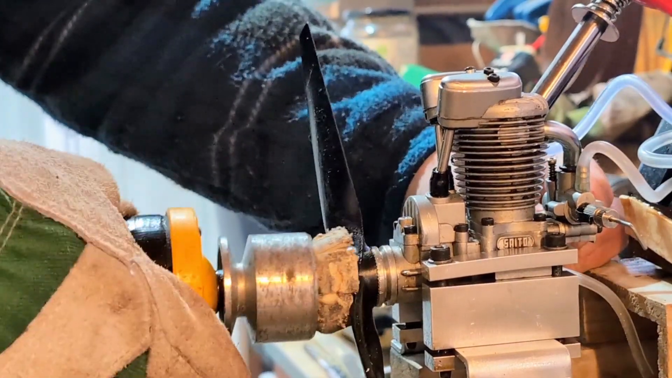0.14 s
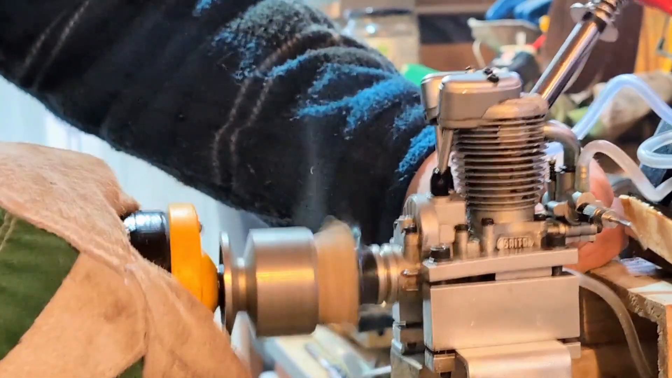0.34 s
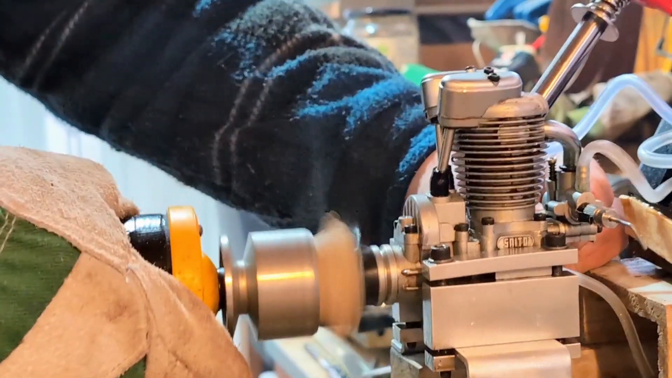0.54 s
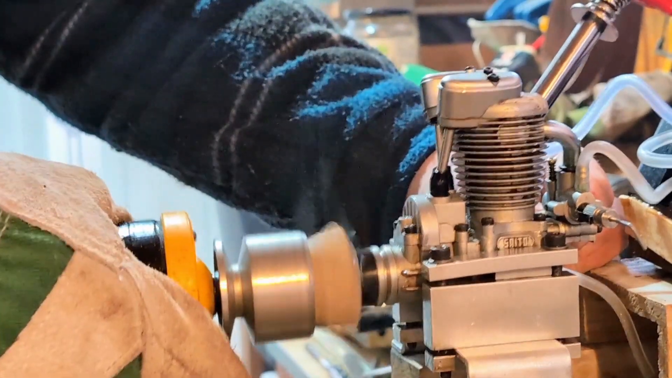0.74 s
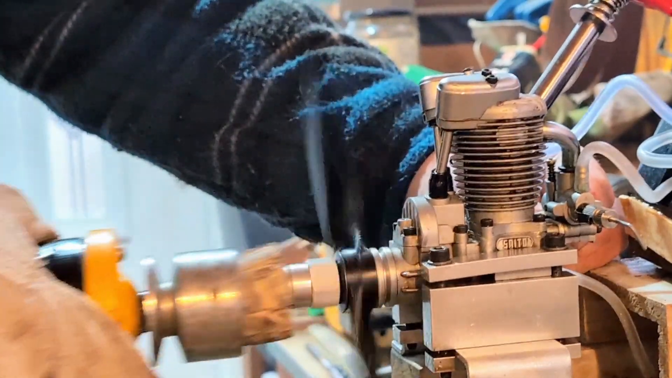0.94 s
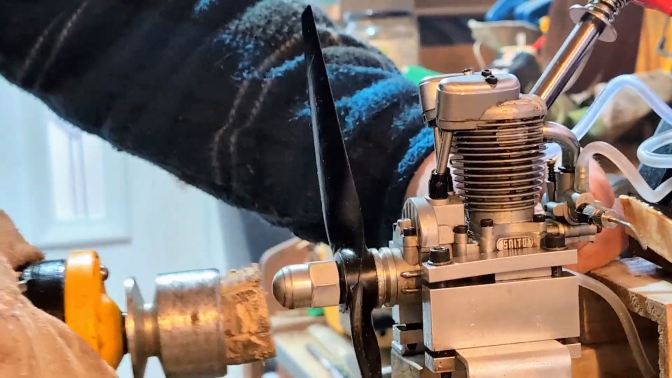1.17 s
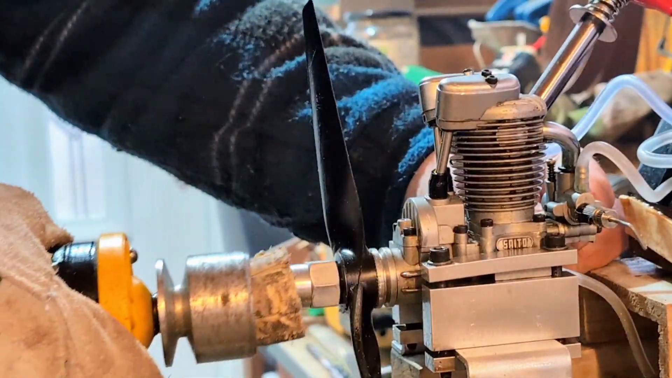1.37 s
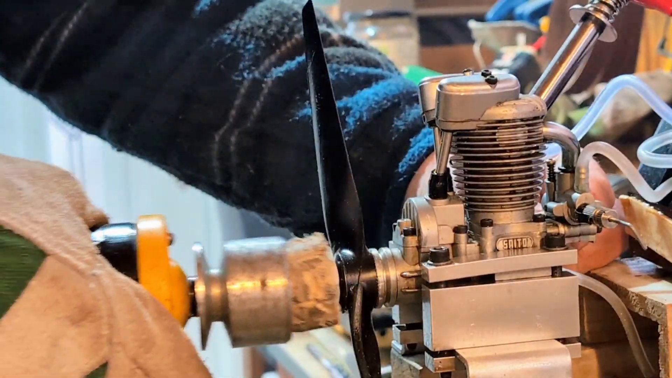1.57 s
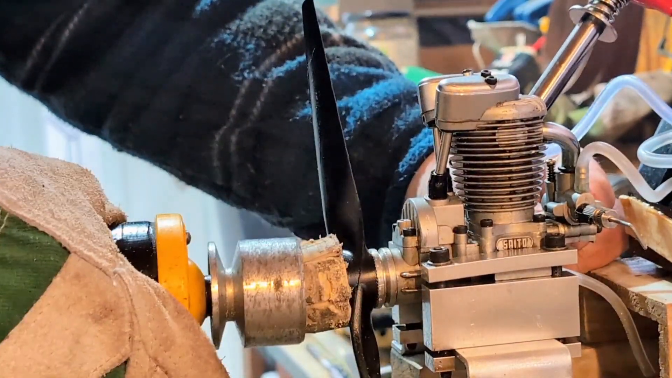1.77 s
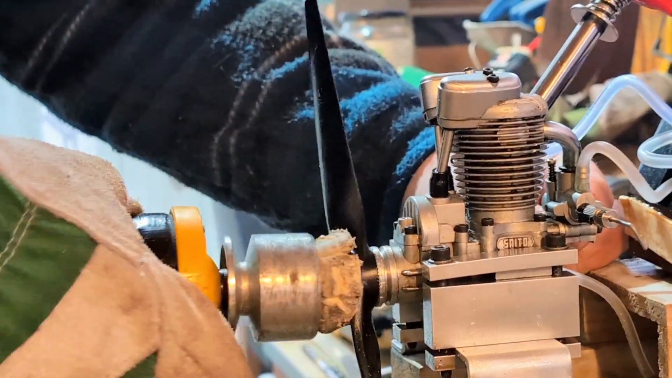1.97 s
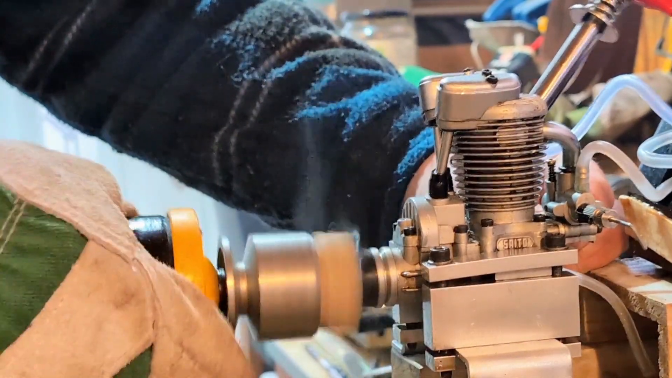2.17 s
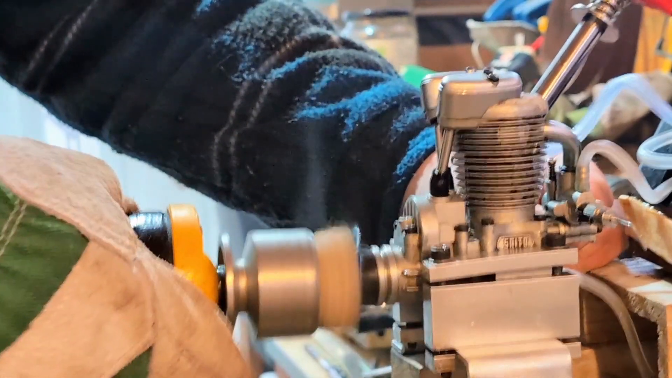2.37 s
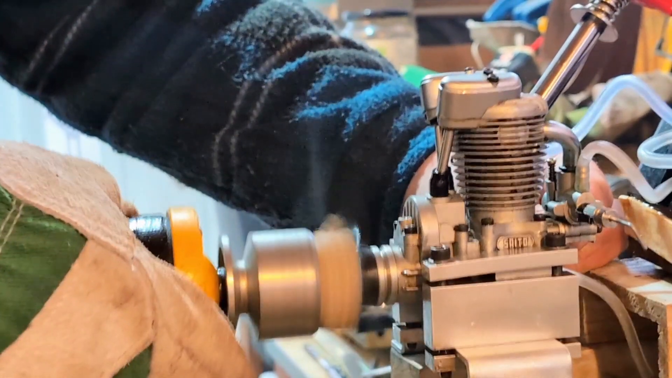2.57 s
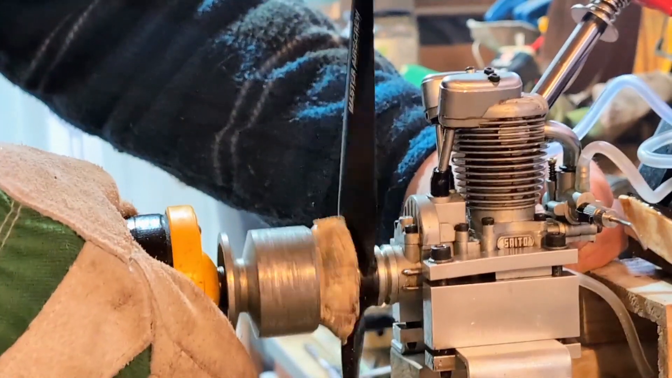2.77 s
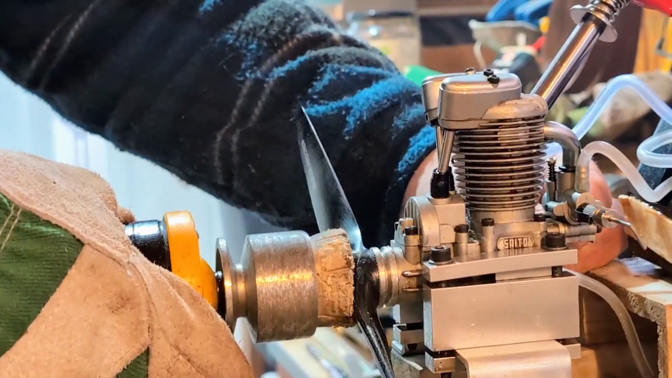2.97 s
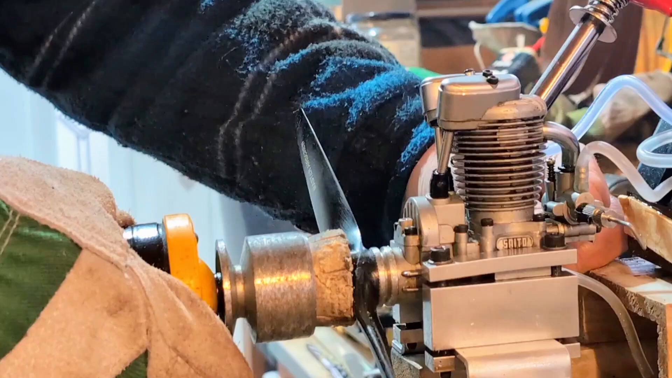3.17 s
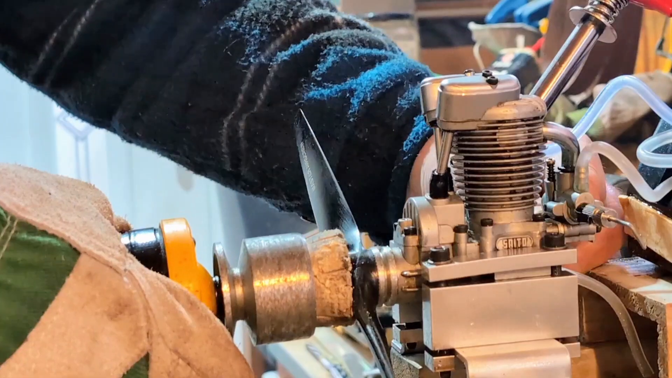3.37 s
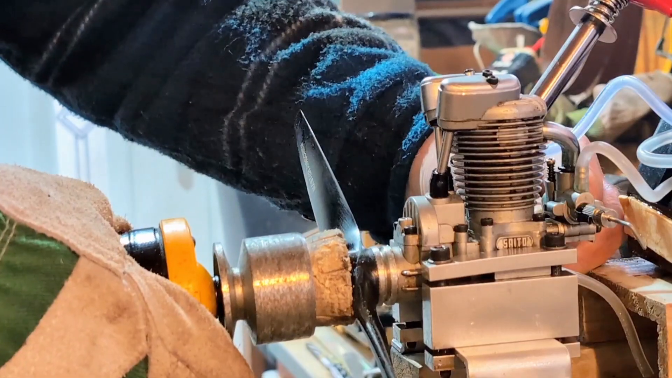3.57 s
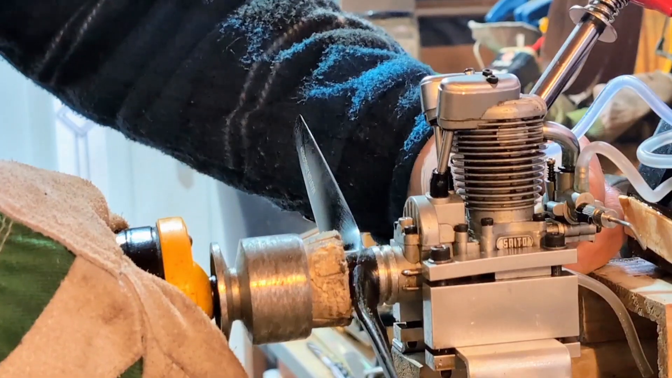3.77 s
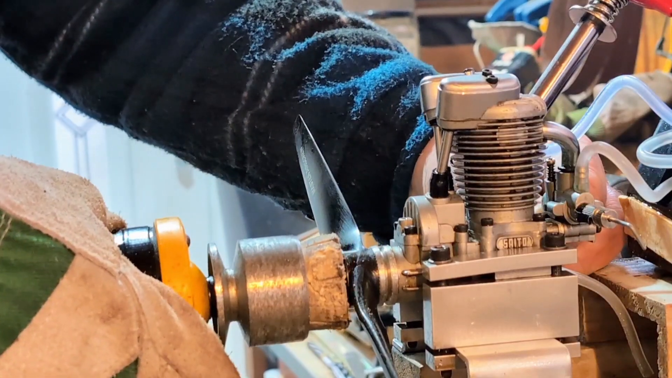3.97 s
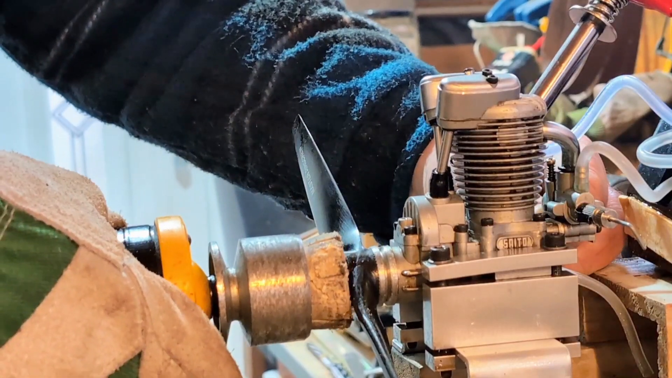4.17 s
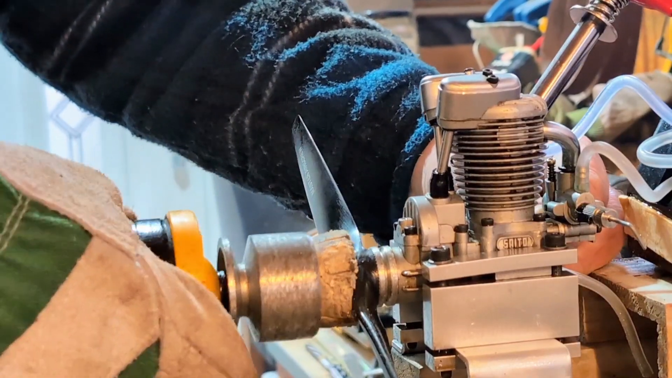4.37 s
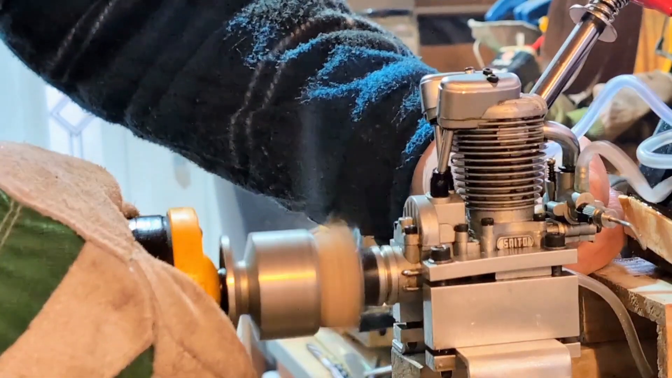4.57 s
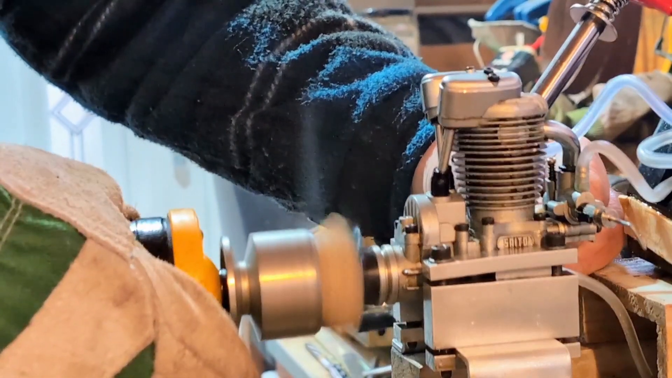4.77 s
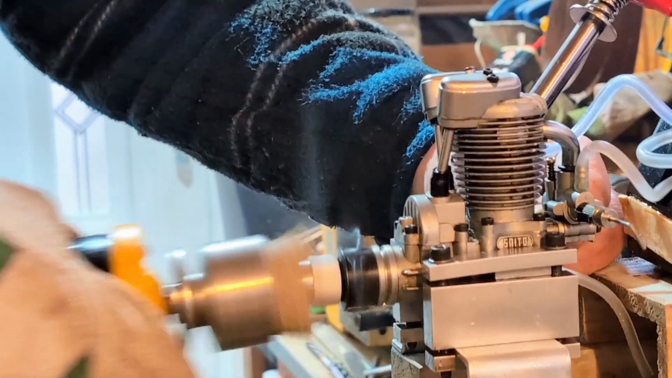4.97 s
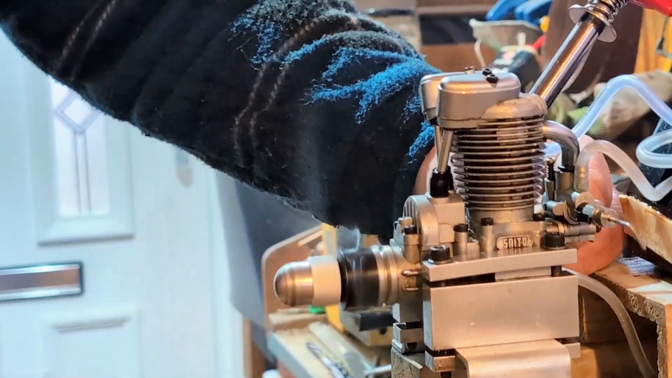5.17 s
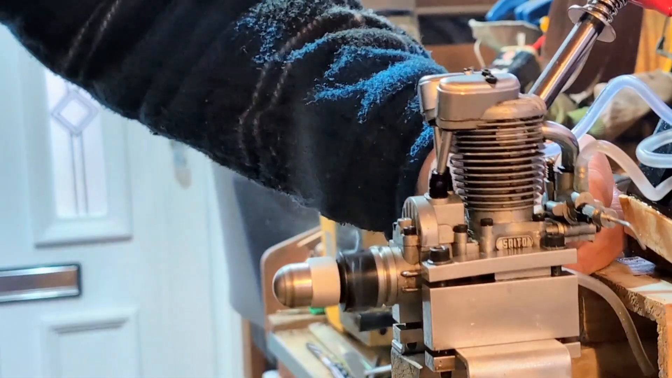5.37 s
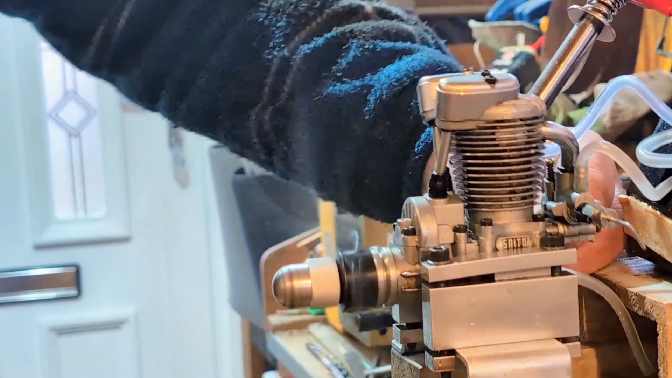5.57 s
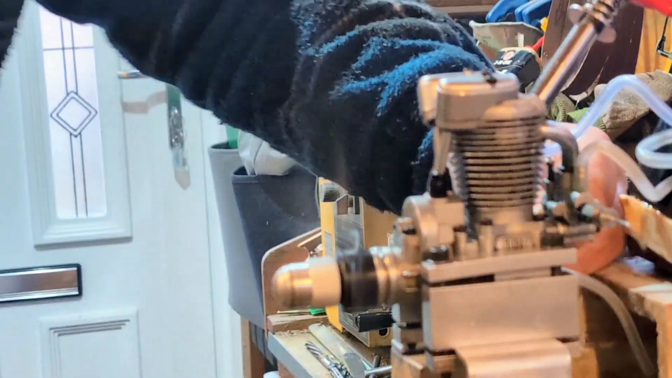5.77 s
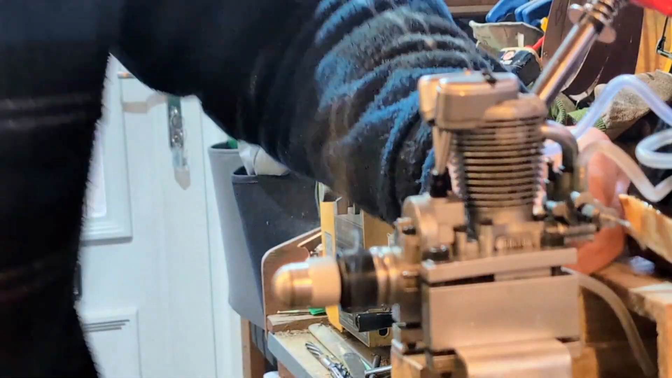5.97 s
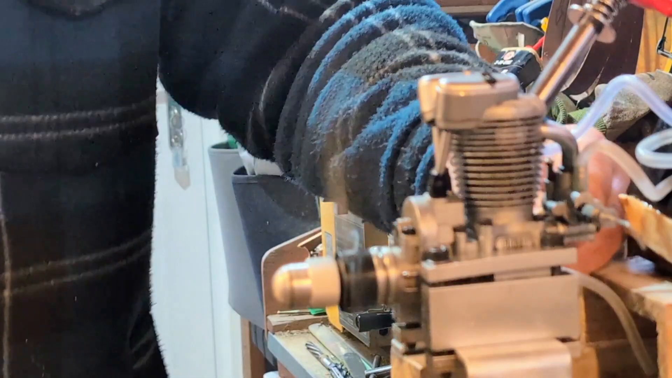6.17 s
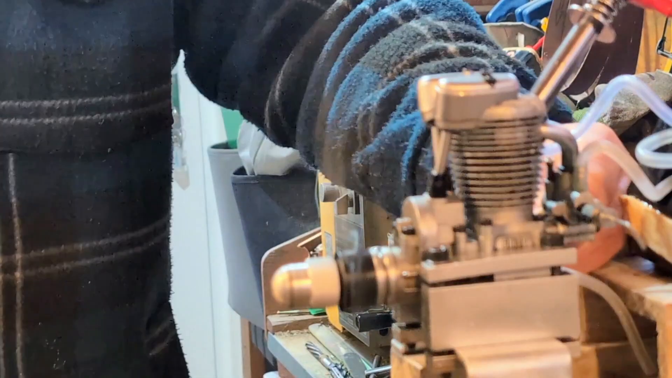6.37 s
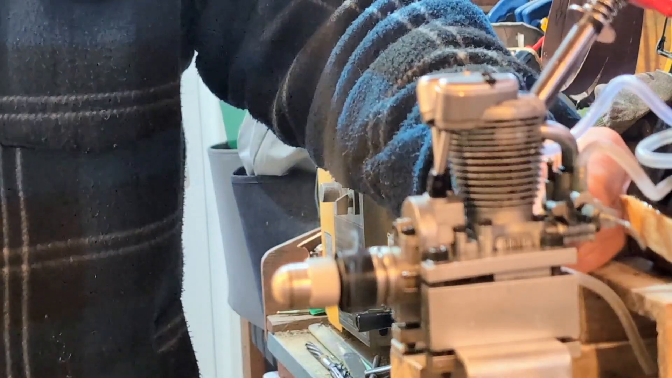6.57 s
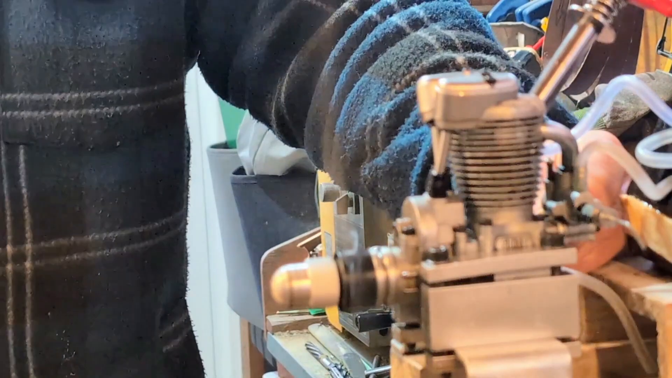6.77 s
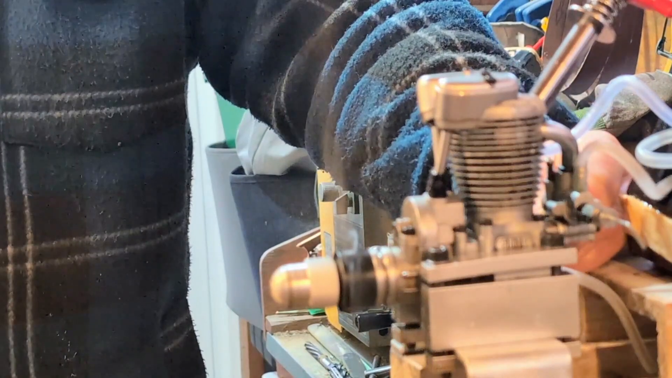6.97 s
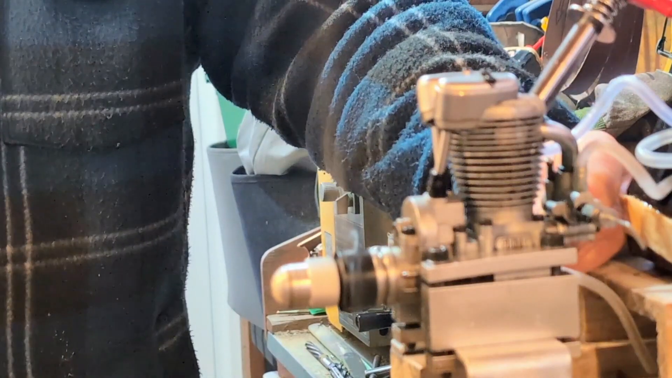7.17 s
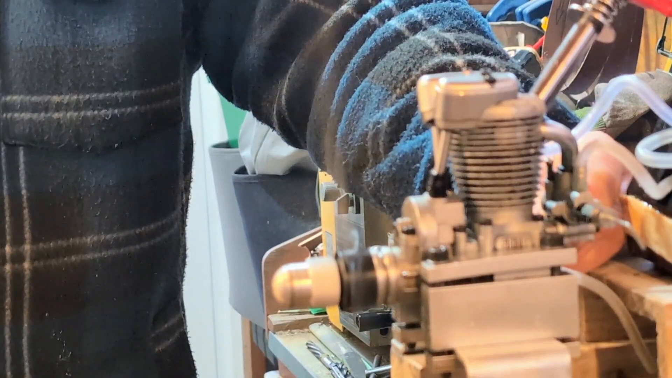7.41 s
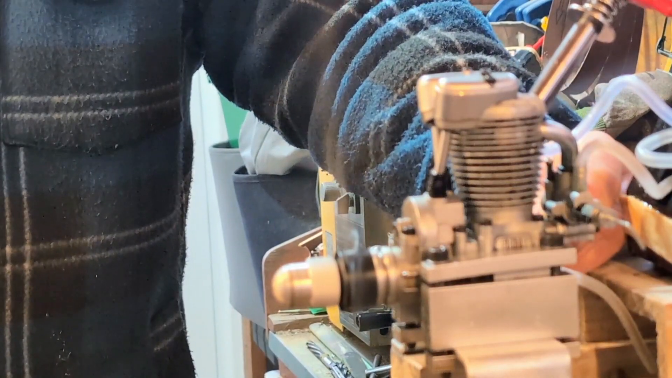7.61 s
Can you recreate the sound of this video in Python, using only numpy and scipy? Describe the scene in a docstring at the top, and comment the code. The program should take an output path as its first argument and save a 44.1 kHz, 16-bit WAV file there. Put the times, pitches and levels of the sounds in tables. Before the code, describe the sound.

An electric starter whirs and squeals against a small model aircraft engine, which catches on the third try and runs unevenly, speeding up.

```python
"""A small four-stroke glow engine is started on a workbench. An electric starter spins it twice in vain:
the motor whirs, unburnt fuel and air hiss out once a cycle (two shaft turns), the drive cup squeals.
At the third try it pops, catches and runs unevenly: each firing is a valve crack and an exhaust thump,
over the rush of gas and propeller. The bench wobbles in the bass, fittings tick, the small room echoes,
and a faint electric buzz fills the pauses."""
import sys
import numpy as np
from scipy import signal
from scipy.fft import rfft, irfft, next_fast_len
from scipy.io import wavfile
from scipy.ndimage import uniform_filter1d, map_coordinates

SR = 44100
rng = np.random.default_rng(int(sys.argv[2]) if len(sys.argv) > 2 else 0)


def inscribe(sig):
    """Save sig as 16-bit PCM at rate SR to the path in sys.argv[1].

    A 1-D sig is mono; a 2-D sig holds one channel per row.
    Samples are clipped to [-1, 1] before scaling.
    """
    pcm = np.round(np.clip(np.atleast_2d(sig).T, -1, 1) * 32767)
    wavfile.write(sys.argv[1], SR, pcm.astype(np.int16))


N = 336924

# Levels are relative. A COLOUR says how strong each pitch is; RINGS are pitches a part rings at.
# Engine speed once it has caught: time_s, firings_per_s
ENGINE_SPEED = [(5.166, 31.5), (5.2, 35), (5.31, 45.9), (5.38, 50.3), (5.53, 56.2), (5.61, 55.5), (5.7, 54),
                (5.92, 49.4), (6.06, 47.6), (6.22, 55), (6.3, 58.6), (6.55, 57.3), (6.75, 63.3),
                (6.82, 64.9), (7.01, 66.7), (7.19, 70.5), (7.43, 76.3), (7.64, 81.1)]
# Exhaust thump, valve crack, the engine's rush and its low, rough layer: pitch_hz, level_db
THUMP_COLOUR = [(100, -31), (200, -4.5), (330, -0.5), (450, 3.5), (560, -3.5), (640, -4), (800, -7),
                (1300, -23), (4000, -76.5)]
CRACK_COLOUR = [(200, -30), (650, -5), (1000, 0), (1300, -1.5), (2150, -3), (2600, -11), (4000, -18),
                (12000, -40)]
ROAR_COLOUR = [(900, -21.5), (2300, -0.5), (4000, -2), (6000, 0.5), (9200, -1), (11500, -2.5), (13000, -10),
               (15500, -10), (16400, -40)]
LOW_ROAR_COLOUR = [(60, -30), (150, -2), (2000, 0), (3500, -30)]
# Muffler, exhaust pipe and casing: pitch_hz, width_hz, level_db
MUFFLER_RINGS = [(339, 60, -5.5), (449.6, 16, 0.5), (532, 13, 1.5)]
PIPE_RINGS = [(830.7, 41, 4.5), (969, 25, 3.5), (1112, 27, 1), (1642, 61, 3.5), (2128, 20, 3.5)]
CASING_RINGS = [(373.3, 220, -8.5), (950, 180, 1.5), (1170, 120, -4.5), (1384, 31, 1.5), (1627, 150, -2),
                (1867, 71, -5.5), (2113, 67, -2), (2885, 83, 0.5)]
# Quick echoes of the crack, a left list and a right list: delay_s, level_db
CRACK_ECHOES = [
    [(.001, -11), (.0027, -8), (.0048, -5), (.0067, -6), (.0088, -2)],
    [(.0024, -1), (.0046, -6), (.0062, -2), (.0077, -1.5)],
]
# Loudness of the gas and propeller rush: time_s, level_db
ROAR_LEVELS = [(4.58, -43.5), (4.645, -35.5), (4.71, -24.5), (4.995, -27.5), (5.37, -21.5), (6.495, -22.5),
               (6.655, -22), (7.64, -22)]
# The starter turning the engine, one list a try: time_s, cycles_so_far, burst_db
TRIES = [
    [(.4095, 0, -6), (.5167, 1, -9.5), (.5711, 2, -7.5), (.6619, 4, -8.5), (.7552, 6, -12.5),
     (.8126, 7, -12), (.8959, 8, -18), (.9792, 9, -30.5)],
    [(2.2752, 0, -16), (2.3444, 1, -15), (2.4139, 2, -9.5), (2.4693, 3, -11), (2.5194, 4, -8),
     (2.7496, 9, -10.5), (2.808, 10, -14.5), (2.8858, 11, -13.5)],
    [(4.639, 0, -11), (4.69, 1, -9.5), (4.733, 2, -6.5), (4.768, 3, -8.5), (4.806, 4, -9), (5.011, 9, -8.5),
     (5.056, 10, -9), (5.133, 12, -8), (5.166, 13, -9.5)],
]
# Loudness of the starter's whir, one list a try: time_s, level_db
WHIR_LEVELS = [
    [(.32, -65.5), (.355, -43.5), (.405, -30), (.465, -34.5), (.535, -22), (.615, -20), (.845, -27.5),
     (.96, -35.5), (1.17, -52.5), (1.325, -72.5)],
    [(2.22, -63.5), (2.255, -35), (2.31, -28.5), (2.495, -25.5), (2.51, -22.5), (2.68, -21), (2.845, -28.5),
     (2.922, -33.5), (2.96, -43), (3.07, -54), (3.17, -65)],
    [(4.559, -58), (4.644, -22.5), (4.89, -22), (5.04, -25), (5.3, -21.5), (5.451, -52.5)],
]
# The starter's whir and the jet of unburnt gas: pitch_hz, level_db
WHIR_COLOUR = [(65, -27.5), (110, 2), (214, -3.5), (339, -3.5), (688, -8), (1130, -4.5), (1460, -4),
               (2900, -3.5), (4880, -5), (10800, -12.5), (14700, -27), (16000, -37)]
JET_COLOUR = [(1760, -35.5), (3000, -7.5), (5440, 0), (7720, 1), (9140, -6), (10700, -8), (16000, -19.5)]
# Squeals of the drive cup: start_s, length_s, low_tone_db, high_tone_db
SQUEALS = [(.61, .04, -29, -31), (0.675, .04, -26, -27), (2.504, .09, -21, -23.5), (2.621, .055, -27, -25),
           (2.69, .1, -38.5, -30), (4.679, 0.08, -24, -28)]
# The cup slipping on the propeller's nose cone: start_s, pitch_hz, level_db
SLIPS = [(0.586, 1091, -23.5), (2.339, 985, -30.5), (2.378, 1110, -29), (2.451, 1814, -24.5),
         (2.509, 2870, -25.5), (2.538, 2893, -26), (2.675, 2890, -28.5), (2.765, 1798, -25),
         (2.833, 1146, -24.5)]
# Small contacts between parts: start_s, level_db, kind
CONTACTS = [(0.096, -53, "clip"), (0.1855, -45.5, "knock"), (0.2322, -49.5, "knock"),
            (0.323, -44.5, "clank"), (1.0275, -29, "clank"), (1.049, -37, "clank"), (1.106, -36, "clank"),
            (1.1627, -42, "seat"), (1.2273, -45.5, "seat"), (1.26, -53, "knock"), (1.8047, -49, "seat"),
            (2.0704, -52, "knock"), (2.1192, -38, "seat"), (2.133, -34, "clank"), (2.219, -40.5, "clank"),
            (2.255, -26, "clank"), (2.506, -18, "clank"), (3.0004, -22, "ping"), (3.1566, -54, "clip"),
            (3.9132, -54, "clip"), (3.974, -61.5, "knock"), (4.435, -71, "knock"), (4.5253, -51.5, "clip"),
            (4.5833, -20.5, "ping")]
# How hard each kind of contact shakes each part: steel_db, wood_db, clip_db, cup_db
CONTACT_KINDS = {"clip": (9.5, -18, -1.5, -9.5), "knock": (-43, -2, -35, -30),
                 "seat": (-20, 0, -6.5, -17.5), "clank": (1.5, -14.5, -13, -13),
                 "ping": (1.5, -21.5, -22.5, -33)}
# Steel fittings, wooden bench, spring clip and drive cup: pitch_hz, width_hz, level_db
STEEL_RINGS = [(6400, 500, 2.5), (7330, 92, 10.5), (9500, 99, 8.5), (10400, 98, 10.5)]
WOOD_RINGS = [(338.4, 550, 3), (700, 330, -1), (1214, 740, 0)]
CLIP_RINGS = [(1660, 160, 4.5), (2050, 130, 5)]
CUP_RINGS = [(3300, 2400, 0), (4400, 1100, -3)]
# Swells of the bench's low wobble, in the pauses and during cranking: time_s, peak_db
BENCH_SWELLS = [(.13, -57.5), (.28, -49.5), (0.439, -32), (1.15, -45), (1.308, -43), (1.51, -41.5),
                (1.661, -45.5), (1.85, -52), (1.93, -49.5), (2.12, -43.5), (3.201, -41.5), (3.38, -37.5),
                (3.54, -36.5), (3.81, -42.5), (3.99, -44.5), (4.15, -45), (4.36, -48), (4.49, -47),
                (4.798, -28.5)]
# Standing waves in the room that lift the bass: pitch_hz, width_hz, level_db
ROOM_BOOMS = [(86, 3.4, 1.5), (211, 21, -4), (254, 32, -27.5), (336.4, 26, -7.5)]
# Standing waves that cancel it: pitch_hz, width_hz, removed_part_db
ROOM_DIPS = [(104.4, 19, -2.5), (150.5, 8.5, 6), (236.2, 8.3, -0.5)]
# Time the room's echo takes to fade by 60 dB: pitch_hz, fade_s
ROOM_FADES = [(200, 0.33), (2000, 0.25), (10000, 0.057)]
# Overtones of the electric buzz: pitch_multiple, level_db
BUZZ_TONES = [(4, -84), (6, -79), (8, -79), (14, -86), (15, -87), (17, -77)]
# The room's quiet hush: pitch_hz, level_db
HUSH_COLOUR = [(53, -26.5), (90, -6), (122, -14), (188, -30), (1240, -35), (2690, -41.5), (4490, -41.5),
               (12000, -61.5), (15600, -94.5), (22000, -120)]
# How alike a noise is on the left and right (1 = the same): pitch_hz, likeness
STEREO_LIKENESS = [(60, 0.93), (240, 0.99), (950, 0.036), (3770, 0.029), (15000, 0.02)]
# Colour difference between the two microphones: pitch_hz, left_minus_right_db
MIC_BALANCE = [(60, -2), (150, -4.5), (380, 0), (950, 0), (2380, 1.8), (5980, -8), (15000, -6)]

THUMP_DB, CRACK_DB, CRACK_GROWS_S = -24.5, -23, 0.3
STEADY_PER_S, STUMBLE_S = 55, .000025  # each firing a second below steady adds this much timing scatter
FALTER_AT_S, FALTER_WIDTH_S, FALTER_DB = 7.315, .012, -5  # one brief dip in the engine's level
SQUEAL_HZ, SQUEAL_WAVER_HZ = (4812, 9370), (3, 20)
BENCH_HZ, BUZZ_HZ = 56.9, 256.6


def engine():
    """The engine pops, catches and speeds up. Returns its noisy sounds and its hum separately."""
    t = np.arange(N) / SR
    rate = curves(ENGINE_SPEED)[0]
    pop_s, pop_db = strokes(TRIES[-1])
    caught_s = pop_s[-1]
    cycle = np.interp(t, pop_s, np.arange(len(pop_s)), left=-.5) + np.cumsum(rate * (t >= caught_s)) / SR
    fired = np.flatnonzero(np.diff(np.floor(cycle)) > 0) + 1  # the sample where each cycle begins
    timing_luck, thump_luck, crack_luck = rng.standard_normal((len(fired), 3)).T
    share_db = 10 * np.log10(SR / rate[fired])  # a steady level shared out among the firings
    starting = t[fired] < caught_s + .01
    starting_db = np.interp(t[fired], pop_s, pop_db)
    scatter = .7 + SR * STUMBLE_S * np.clip(STEADY_PER_S - rate[fired], 0, 8)
    fired = np.clip(fired + np.round(scatter * timing_luck).astype(int), 0, N - 1)

    # Thump and crack both thin out by 5 dB each time the speed doubles.
    thump_db = THUMP_DB + share_db - 5 * np.log2(np.maximum(rate[fired], 50) / 60) + 0.91 * thump_luck
    growing_db = CRACK_DB - 6 * np.clip(1 - (t - caught_s) / CRACK_GROWS_S, 0, 1)
    crack_db = growing_db[fired] + share_db - 4 - 5 * np.log2(np.maximum(rate[fired], 60) / 60)
    thumps = exhaust_thumps(fired, np.where(starting, starting_db + 17, thump_db))
    cracks = valve_cracks(fired, np.where(starting, starting_db + 7, crack_db + crack_luck))
    hum = engine_hum(cycle, rate, fade_in=np.clip((t - caught_s) / 0.06, 0, 1))
    beat = 0.64 + 0.65 * np.exp(-(cycle % 1) / rate / 0.031)  # loudest as the valve opens
    roar = gas_roar() + low_roar(rate, growing_db) * np.clip((t - pop_s[0]) / .02, 0, 1)
    falter = amp(FALTER_DB * bump(FALTER_AT_S, FALTER_WIDTH_S))
    return falter * (cracks - thumps + beat * roar), falter * hum


def exhaust_thumps(fired, db):
    """Each push of exhaust rings the muffler and reaches the right side just before the left."""
    pushes = pulses(fired, db, THUMP_COLOUR)
    thumps = filtered(pushes, lambda hz: resonant(MUFFLER_RINGS, hz) * standing_waves(hz))
    return np.array([delayed(thumps, 0.0005), delayed(thumps, 0.0002)])


def valve_cracks(fired, db):
    """Each crack of the valve rings the pipe, followed by quick echoes of wavering strength."""
    cracks = filtered(pulses(fired, db, CRACK_COLOUR), lambda hz: resonant(PIPE_RINGS, hz))
    return np.array([cracks + sum(amp(echo_db + wobble(12)) * delayed(cracks, s) for s, echo_db in side)
                     for side in CRACK_ECHOES])


def engine_hum(cycle, rate, fade_in):
    """Bench, shaft and propeller blades hum at multiples of the firing rate."""
    bench_db = -24 + 20 * np.log10(np.abs(resonant([(BENCH_HZ, 7, 0)], rate, 0.029)))  # booms near BENCH_HZ
    blade_db = -29 + 19 * np.log2(rate / 60)  # louder with speed
    levels = {1: bench_db, 2: -29, 3: -44.5, 4: blade_db, 8: -39}  # 2 is the shaft, 4 and 8 the blades
    tones = sum(amp(db + 2.4 * wobble(13)) * np.sin(2 * np.pi * k * cycle) for k, db in levels.items())
    return filtered(np.sqrt(2) * fade_in * tones, standing_waves)


def gas_roar():
    """Exhaust gas and the propeller's wind make a fluttering rush."""
    db = curves(ROAR_LEVELS, rest=-120)[0] - 1.2
    flutter_db = 0.79 * wobble(5.4) + 0.74 * wobble(20) + 1.6 * wobble(300)
    return amp(db + flutter_db) * stereo_noise(ROAR_COLOUR, CASING_RINGS[-1:])


def low_roar(rate, db):
    """The low, rough layer of the engine's rush, weaker at high speed."""
    speed_db = -9 * np.log2(np.maximum(rate, 58) / 58)
    return amp(db - 9 + speed_db + 2 * wobble(90)) * stereo_noise(LOW_ROAR_COLOUR)


def starter():
    """The electric motor whirs and turns the humming propeller through a cup that squeals and slips."""
    whir_db = curves(*WHIR_LEVELS, rest=-120)[0]
    whir = motor_whir(whir_db)
    squeal = cup_squeal()
    cycle = cranked_cycles()
    turning = np.clip(np.gradient(cycle) * SR / 20, 0, 1) ** 2
    blades = sum(amp(whir_db + db + 3.4 * wobble(14)) * np.sin(2 * np.pi * multiple * cycle)
                 for multiple, db in ((4, -7), (6, -15)))
    return whir + squeal + cup_slips() + turning * blades


def motor_whir(db):
    """Brush and gear noise rings in the casing; the gears mesh unevenly, so each band flickers."""
    low, middle, high = [unit(amp(1.5 * wobble(60) + 2.5 * wobble(300))) for band in range(3)]
    noise = stereo_noise(WHIR_COLOUR, CASING_RINGS)
    treble = filtered(noise, lambda hz: 1 / (1 + (3500 / (hz + 1)) ** 4))
    bass = filtered(noise, lambda hz: 1 / (1 + (hz / 1400) ** 4))
    dull = amp(2.7 * np.minimum(db + 31.5, 0))  # a slower motor loses its treble first
    grind = low * bass + middle * (noise - bass - treble) + high * dull * treble
    return amp(db - 1.86) * (grind + amp(-5) * gear_pings())


def gear_pings(strikes_per_s=18, knock_db=-6.5):
    """Gear teeth strike each casing part at random, and the cup knocks once a shaft turn."""
    parts = len(CASING_RINGS)
    knocks = np.diff(np.floor(2 * cranked_cycles() + .3), prepend=0) * amp(knock_db)
    teeth = rng.random((parts, N)) < strikes_per_s / SR
    strikes = (teeth + knocks) * amp(4 * rng.standard_normal((parts, N)))
    rings = filtered(strikes, lambda hz: np.array([resonant([part], hz, 0) for part in CASING_RINGS]))
    flipped = rings * (-1) ** np.arange(parts)[:, None]  # makes right differ from left
    return unit(np.array([rings.sum(axis=0), flipped.sum(axis=0)]))


def cup_squeal(rise_s=0.006, fall_db_per_s=250):
    """The drive cup squeals in two unsteady tones that rise fast, sag and then die."""
    t, levels = np.arange(N) / SR, []
    sag_db_per_s = np.array([[60], [15]])  # low tone, high tone
    for s, length_s, *db in SQUEALS:
        rise = 20 * np.log10(np.clip((t - s) / rise_s, 1e-9, 1))
        fall = sag_db_per_s * np.maximum(t - s, 0) + fall_db_per_s * np.maximum(t - s - length_s, 0)
        levels.append(np.array(db)[:, None] + rise - fall)
    squeal = 0
    for hz, db, waver_hz in zip(SQUEAL_HZ, np.max(levels, axis=0), SQUEAL_WAVER_HZ):
        pitch_hz = hz + waver_hz * wobble(60)
        squeal = squeal + amp(db + wobble(30)) * np.sin(2 * np.pi * np.cumsum(pitch_hz) / SR)
    return squeal


def cup_slips(peak_s=.0045):
    """Each slip of the cup swells and dies on one ringing part."""
    t, out = np.arange(SR // 10) / SR, np.zeros((2, N + SR))
    swell = t / peak_s * np.exp(1 - t / peak_s)
    for (s, hz, db), phase in zip(SLIPS, rng.random((len(SLIPS), 2, 1))):
        add_at(out, s, 2 * amp(db) * swell * np.sin(2 * np.pi * (hz * t + phase)))
    return out[:, :N]


def valve_hiss(rise_s=0.0025, fade_s=0.066):
    """On the failed tries, unburnt gas jets out each time the valve opens."""
    t, puffs = np.arange(SR // 5) / SR, np.zeros(N + SR)
    for s, db in np.concatenate([strokes(rows) for rows in TRIES[:-1]], axis=1).T:
        add_at(puffs, s, amp(db + rng.normal(-6, 1) - 60 * t / fade_s) * (1 - np.exp(-t / rise_s)))
    return puffs[:N] * stereo_noise(JET_COLOUR, [(7460, 310, 1.8), (10540, 1200, 23)])


def fitting_ticks():
    """Each contact is a short scrape of noise that shakes steel fittings, bench, spring clip and cup."""
    t, shakes = np.arange(SR // 4) / SR, np.zeros((4, N + SR))
    fade_s = [[.13], [.085], [.1], [.11]]  # steel, wood, clip, cup
    for s, db, kind in CONTACTS:
        add_at(shakes, s, amp(db + np.array(CONTACT_KINDS[kind])[:, None] - 60 * t / fade_s))
    bright = [(4500, -30), (6200, 5), (11000, 4.5), (16000, -15)]  # pitch_hz, level_db
    steel = lambda hz: amp(-11) * unit(np.abs(resonant(STEEL_RINGS, hz) * amp(along(bright, hz))))
    wood = lambda hz: amp(9) * resonant(WOOD_RINGS, hz, 0) ** 2 / (1 + 1j * hz / 1500)
    clip = lambda hz: amp(14) * resonant(CLIP_RINGS, hz, 0) ** 2
    cup = lambda hz: amp(13.5) * resonant(CUP_RINGS, hz, 0) ** 2
    return sum(filtered(shake * rng.standard_normal((2, N)), part)
               for shake, part in zip(shakes[:, :N], (steel, wood, clip, cup)))


def bench_rocking(rise_s=0.015, fade_s=0.29):
    """The bench's low wobble swells and is kicked by each compression; harder shaking lifts its pitch."""
    t, kicks = np.arange(SR // 2) / SR, np.zeros(N + SR)
    for s, db in np.concatenate([strokes(rows) for rows in TRIES], axis=1).T:
        add_at(kicks, s, amp(db - 20 - 60 * t / fade_s) * (1 - np.exp(-t / rise_s)))
    swells = sum(amp(db) * bump(s, width_s=0.048) for s, db in BENCH_SWELLS)
    db = 20 * np.log10(kicks[:N] + swells + amp(-65))
    hz = BENCH_HZ + .25 * np.clip(db + 48, 0, 30) + 1.5 * wobble(9)
    phase = 2 * np.pi * np.cumsum(hz) / SR
    level = np.sqrt(2) * uniform_filter1d(amp(db + 3.5 * wobble(22)), size=600)
    return level * (np.sin(phase) + amp(-21.5) * np.sin(2 * phase))


def standing_waves(hz):
    """The room lifts some bass pitches and cancels others."""
    return resonant(ROOM_BOOMS, hz) * np.prod([1 - resonant([dip], hz, 0) for dip in ROOM_DIPS], axis=0)


def room_echo(x):
    """The small room's echo, with the treble dying first."""
    hz, t, noise = signal.stft(rng.standard_normal((2, SR // 2)), SR, nperseg=256)
    tail = signal.istft(noise * amp(-60 * t / along(ROOM_FADES, hz)[:, None]), SR, nperseg=256)[1]
    return signal.fftconvolve(x, tail / np.linalg.norm(tail[0]), axes=1)[:, :N]


def buzz_and_hush():
    """A thin electric buzz over a quiet, bass-heavy hush."""
    phase = 2 * np.pi * BUZZ_HZ * np.arange(N) / SR
    buzz = sum(np.sqrt(2) * amp(db + 1.1 * wobble(9.9)) * np.sin(k * phase) for k, db in BUZZ_TONES)
    hush = amp(-64.5 + 1.5 * wobble(9) + 2 * wobble(2.5)) * stereo_noise(HUSH_COLOUR)
    return amp(-3) * buzz + hush


def strokes(rows):
    """Time and burst level of every whole cycle of one try."""
    s, cycles, db = np.transpose(rows)
    whole = np.arange(cycles[-1] + 1)
    return np.interp(whole, cycles, s), np.interp(whole, cycles, db)


def cranked_cycles():
    """Cycles turned by the starter so far."""
    t = np.arange(N) / SR
    return uniform_filter1d(sum(np.interp(t, *np.transpose(rows)[:2]) for rows in TRIES), 2000)


def pulses(fired, db, colour, size=4096):
    """The shortest pulse that has this colour, played at each firing."""
    kicks = np.zeros(N)
    kicks[fired] = amp(db)
    cepstrum = irfft(np.log(amp(along(colour, np.fft.rfftfreq(size, 1 / SR))) + 1e-4))
    cepstrum[1:size // 2] *= 2  # folding it forward packs the energy at the pulse's start
    cepstrum[size // 2 + 1:] = 0
    pulse = irfft(np.exp(rfft(cepstrum)))
    return signal.fftconvolve(kicks, pulse / np.linalg.norm(pulse))[:N]


def stereo_noise(colour, rings=()):
    """Coloured noise, alike on left and right in the bass only."""
    def response(hz):
        angle = np.arccos(np.clip(along(STEREO_LIKENESS, hz), -1, 1)) / 2
        return amp(along(colour, hz)) * resonant(rings, hz) * [np.cos(angle), np.sin(angle)]
    mid, side = filtered(rng.standard_normal((2, N)), response)
    return np.array([mid + side, mid - side]) / np.sqrt(np.mean(mid ** 2))


def resonant(rings, hz, flat=1):
    """Ringing peaks on top of a flat response."""
    return flat + sum(amp(db) * 1j * hz * width / (pitch ** 2 - hz ** 2 + 1j * hz * width)
                      for pitch, width, db in rings)


def filtered(x, response):
    """x with each pitch scaled by response(hz)."""
    size = next_fast_len(N + SR // 2)
    return irfft(rfft(x, size) * response(np.fft.rfftfreq(size, 1 / SR)), size)[..., :N]


def wobble(per_s):
    """A smooth curve through per_s random values a second."""
    coarse = np.arange(0, N + 16, 16)
    values = rng.standard_normal(int(N * per_s / SR) + 4)
    return np.interp(np.arange(N), coarse, map_coordinates(values, [coarse * per_s / SR]))


def curves(*tables, rest=None):
    """Each column after the time as a curve; rest holds outside a table, and the highest table wins."""
    t = np.arange(N) / SR
    return np.max([[np.interp(t, times, column, rest, rest) for column in columns]
                   for times, *columns in map(np.transpose, tables)], axis=0)


def along(points, hz):
    """A table's value at any pitch, blended on a log scale."""
    pitches, values = np.transpose(points)
    return np.interp(np.log(hz + 1), np.log(pitches + 1), values)


def bump(s, width_s):
    """A smooth hill peaking at s seconds."""
    return np.exp(-.5 * ((np.arange(N) / SR - s) / width_s) ** 2)


def add_at(track, s, x):
    """Add x to the track at s seconds."""
    track[..., round(s * SR):][..., :x.shape[-1]] += x


def delayed(x, s):
    """x heard s seconds later."""
    return np.pad(x, (round(s * SR), 0))[:N]


def amp(db):
    """Turn decibels into a gain."""
    return 10 ** (np.asarray(db) / 20)


def unit(x):
    """x scaled to an average power of 1."""
    return x / np.sqrt(np.mean(x ** 2) + 1e-20)


def scene():
    """All sources together; the exhaust is kept drier, with less room echo than the starter."""
    exhaust, hum = engine()
    cranking = starter() + valve_hiss() + fitting_ticks()
    echo = room_echo(amp(-7.5) * cranking + amp(-13) * exhaust)
    return exhaust + hum + cranking + echo + bench_rocking() + buzz_and_hush()


def record(dry):
    """Two microphones differ in colour; peaks are rounded off and the highest treble is cut."""
    mics = filtered(dry, lambda hz: amp(along(MIC_BALANCE, hz) * [[.5], [-.5]]))
    rounded = mics / (1 + np.abs(mics / .95) ** 4) ** (1 / 4)
    return filtered(rounded, lambda hz: hz < 16300)


dry = scene()
out = record(dry)
inscribe(out)
```